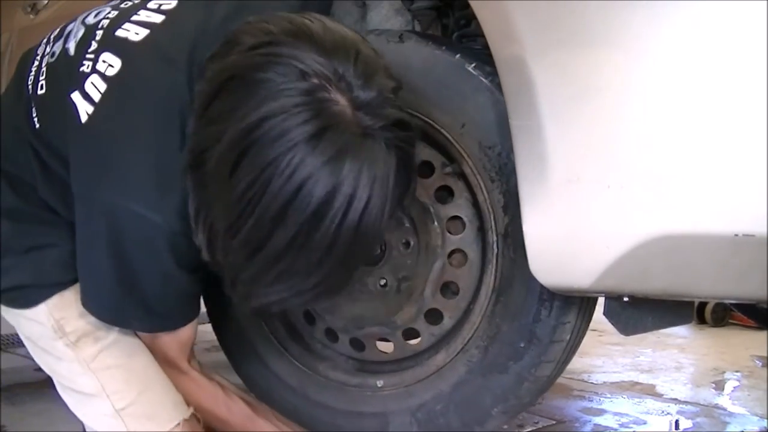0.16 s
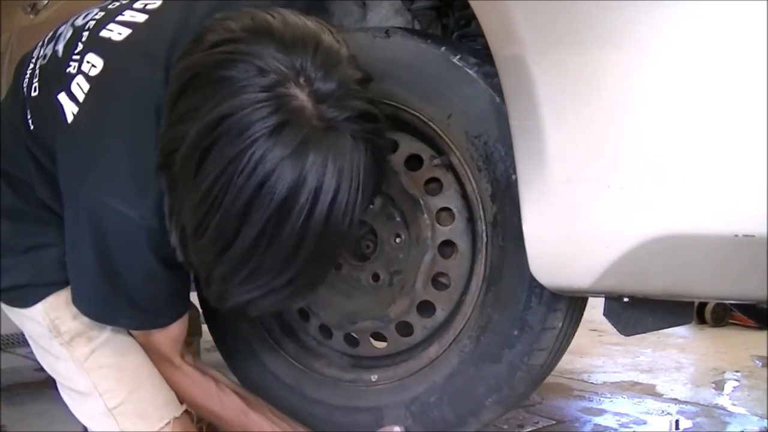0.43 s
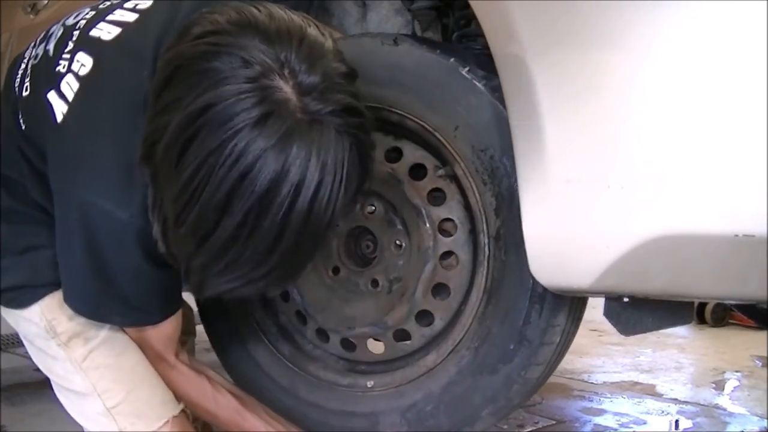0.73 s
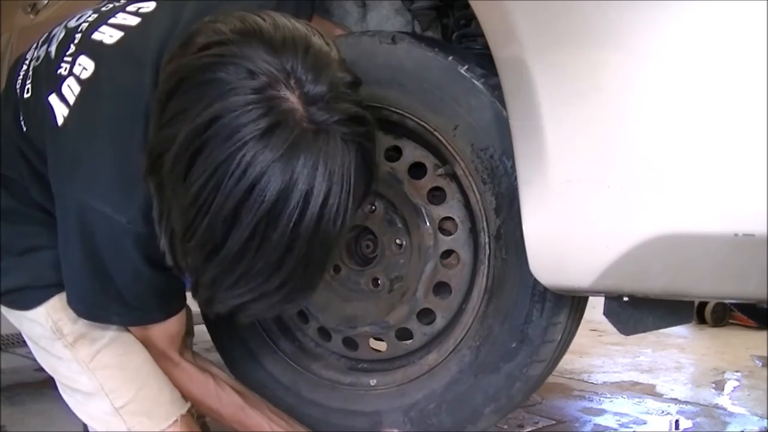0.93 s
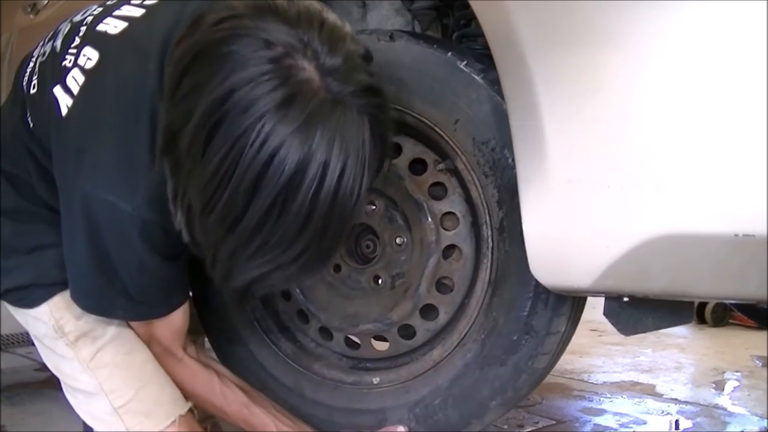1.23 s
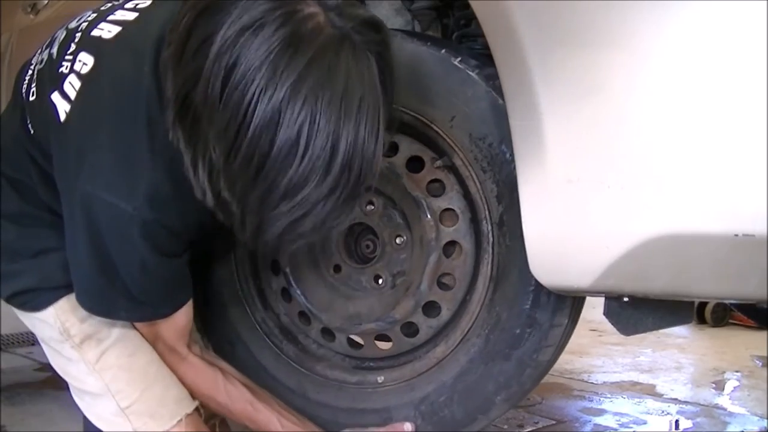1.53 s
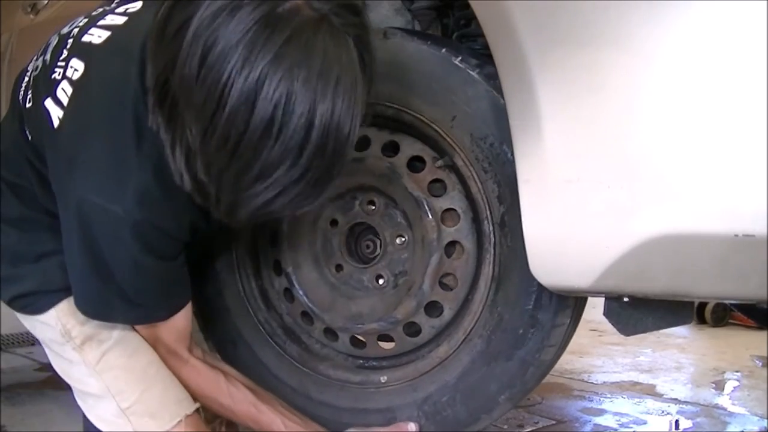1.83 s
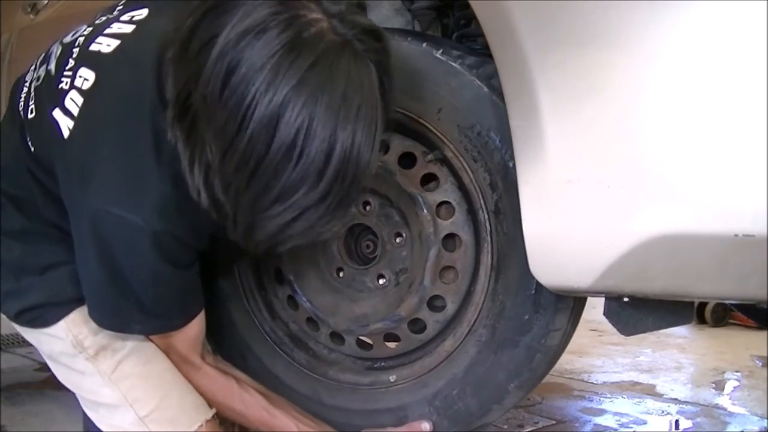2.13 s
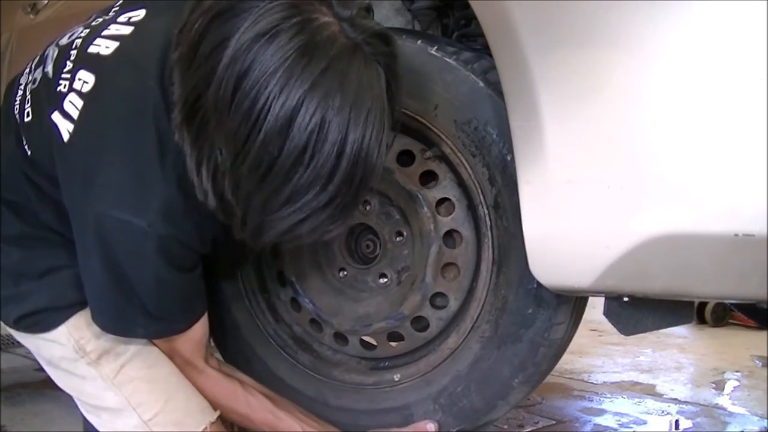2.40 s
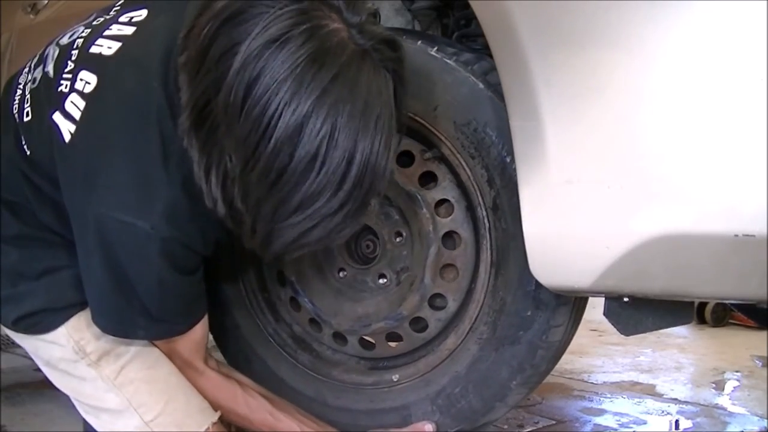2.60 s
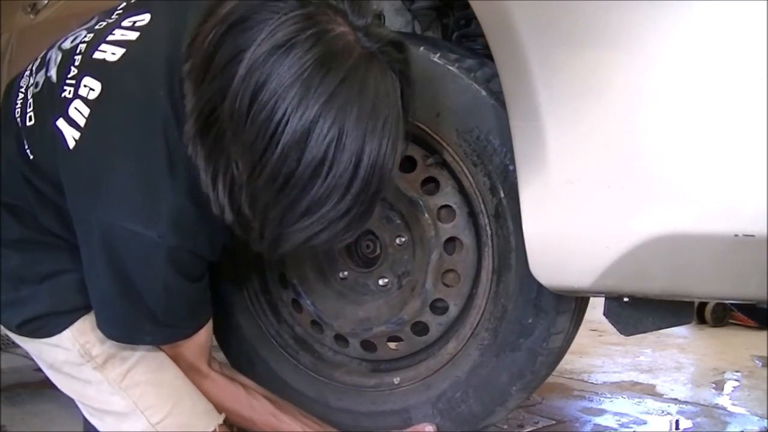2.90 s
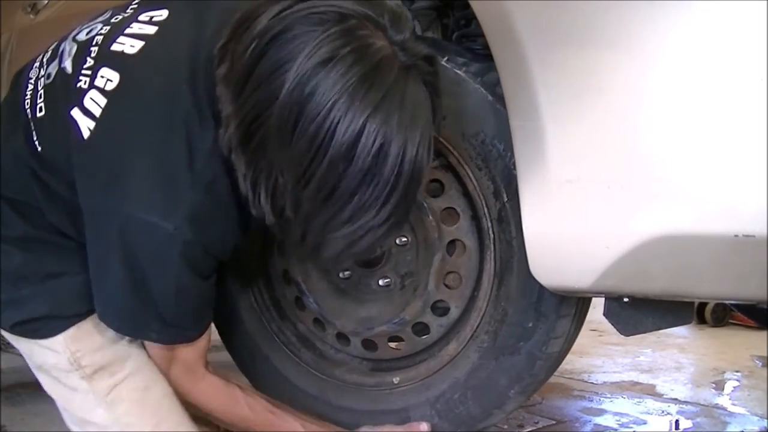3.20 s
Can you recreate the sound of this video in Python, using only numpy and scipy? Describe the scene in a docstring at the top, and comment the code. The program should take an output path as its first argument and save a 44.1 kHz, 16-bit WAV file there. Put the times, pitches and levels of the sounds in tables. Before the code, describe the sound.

A steel wheel clanks and scrapes as it is worked onto a car's hub.

```python
"""Damped steel clanks and tyre thuds, close and almost mono: a wheel is worked onto a car's hub in a garage.
Its centre scrapes over the studs, which catch and ping, and knocks against the hub.
At last it drops onto the studs and the whole rim rings. Underneath, the rocking tyre rumbles,
clothes rustle and grit ticks over faint room noise."""
import sys
import numpy as np
from scipy import signal
from scipy.fft import rfft, irfft, next_fast_len
from scipy.io import wavfile

SR = 44100
rng = np.random.default_rng(int(sys.argv[2]) if len(sys.argv) > 2 else 0)


def to_wav(s):
    """Save 16-bit WAV."""
    ch = np.atleast_2d(s).T  # columns
    pcm = np.round(np.clip(ch, -1, 1) * 32767)  # PCM
    wavfile.write(sys.argv[1], SR, pcm.astype(np.int16))


N = 147735

# The wheel's centre, damped by the hub. Each row: pitch in Hz, relative level in dB, t60 in seconds.
CENTRE_MODES = [(487, -12.5, 0.16), (789, -26, 0.36), (944, -15, 0.13), (1013.6, -6, 0.066),
                (1085.5, 5, 0.099), (1186, 0.5, 0.03), (1313, -7, 0.2), (1430, -5.5, 0.074),
                (1555, -10.5, 0.045), (1800, -11.5, 0.084), (2395, -14.5, 0.093)]
# Studs and hub ringing. One entry per mode: pitch in Hz, relative level in dB, t60 in seconds.
STUD_HZ = [1034, 1427, 1776, 2417, 2930, 3297, 4005, 4135, 4480, 5134, 5852, 6089, 6337, 7358, 7860, 8129,
           8441, 9635, 10100]
STUD_DB = [3, 7.5, -2.5, 5, 2.5, -10, -3.5, 3.5, -15, -1.5, -8, -27.5, -1.5, -4.5, -10, -14, 1.5, -6, -14]
STUD_T60_S = [0.23, 0.1, 0.083, 0.088, 0.1, 0.22, 0.28, 0.047, 0.16, 0.11, 0.18, 0.33, 0.11, 0.09, 0.19,
              .22, 0.06, 0.15, 0.06]
# The studs' crowd of weak modes. Each row: band in Hz, relative level in dB, t60 in seconds.
STUD_WASH = [(855, 12, 0.033), (1390, 1, 0.45), (2000, -26, 0.057), (2570, 12, 0.19), (3320, -13.5, 0.071),
             (4000, 0.5, 0.067), (7000, 0, 0.1), (8300, -2.5, .13), (9800, -1, 0.044), (10150, 5.5, 0.043),
             (12260, -21.5, .08), (15500, -36, .05)]


def undb(db):
    """Decibels to gain."""
    return 10 ** (np.asarray(db) / 20)


def unit(x):
    """Scale to rms 1."""
    return x / np.sqrt(np.mean(x ** 2))


def struck(x, size=882):
    """Scale a hit to rms 1 over its first samples."""
    return x / np.sqrt(np.mean(x[:size] ** 2))


def along(table, hz):
    """Read a table's second column on a log-frequency axis."""
    table = np.array(table, float)
    return np.interp(np.log(np.maximum(hz, 1)), np.log(table[:, 0]), table[:, 1])


def fader(table, column=1):
    """Gain over time from rows of seconds and dB."""
    table = np.array(table, float)
    return undb(np.interp(np.arange(N) / SR, table[:, 0], table[:, column]))


def colour(x, table):
    """Give a steady sound a spectrum, at rms 1."""
    size = next_fast_len(N)
    gains = undb(along(table, np.fft.rfftfreq(size, 1 / SR)))
    return unit(irfft(rfft(x, size) * gains, size)[:N])


def causal(table, count):
    """Minimum-phase response: a given spectrum with nothing ahead of the attack."""
    cepstrum = irfft(np.log(undb(along(table, np.fft.rfftfreq(count, 1 / SR)))), count)
    return np.exp(rfft(cepstrum * (1 + np.sign(np.fft.fftfreq(count)))))


def ring(modes, count):
    """Struck modes as decaying sines of alternating polarity."""
    t = np.arange(count) / SR
    return struck(sum((-1) ** k * undb(db) * np.sin(2 * np.pi * hz * t) * np.exp(-np.log(1000) * t / t60)
                      for k, (hz, db, t60) in enumerate(modes)))


def wash(table, count):
    """A crowd of modes: noise whose bands each die at their own rate."""
    t, hz = np.arange(count) / SR, np.fft.rfftfreq(count, 1 / SR)
    noise = rfft(rng.standard_normal(count))
    band_hz, _, t60s = np.array(table).T
    out = 0
    for share, t60 in zip(np.eye(len(table)), t60s):
        band = along(np.c_[band_hz, share], hz)
        out = out + irfft(noise * band, count) * np.exp(-np.log(1000) * t / t60)
    return struck(irfft(rfft(out) * causal(table, count), count), size=count // 16)


def add(out, start_s, x):
    """Mix a sound in at a time."""
    i = max(int(start_s * SR), 0)
    out[i:i + len(x)] += x[:N - i]


def grains(per_s, spread_db):
    """Random clicks, mostly weak and a few strong."""
    clicks = (rng.random(N) < per_s / SR) * rng.choice([-1, 1], N)
    return clicks * undb(spread_db * np.minimum(rng.exponential(size=N), 4))


def hub_knocks():
    """Each knock cracks, clanks the wheel's centre, thuds the tyre and leaves the rim ringing."""
    # Each row: start in seconds, levels of clank, thud, rim and crack in dB, main clank pitch in Hz.
    knocks = [(.012, -43, -32.5, -47.5, -60, 1080), (0.025, -51, -49, -54, -59, 1050),
              (0.043, -36, -65, -46, -61, 1010), (.365, -37.5, -42, -56, -63, 1060),
              (.678, -34.5, -35, -59, -34, 1108), (.758, -25.5, -24, -43, -34.5, 1100),
              (0.836, -37, -30, -62, -61, 1111), (1.016, -48.5, -39, -53, -45.5, 1140),
              (1.048, -35, -34.5, -50, -61, 1118), (1.092, -19.5, -25.5, -33, -23.5, 1104),
              (1.223, -51, -41, -56, -39, 1040), (1.308, -35, -29, -46.5, -54, 1103),
              (1.730, -34, -33, -51.5, -44, 1083), (1.797, -46, -62, -52.5, -48, 1124),
              (2.476, -49.5, -50, -74, -65, 1113), (2.581, -34, -37, -52, -40, 1109),
              (2.848, -29, -34.5, -58, -52, 1026), (2.872, -18, -21.5, -47, -35, 1092),
              (2.884, -23, -27.5, -72, -27, 1015), (2.899, -39, -37.5, -43.5, -42, 1026),
              (2.929, -30.5, -27, -41, -36.5, 1080), (3.0121, -18, -21.5, -18.5, -17.5, 1108),
              (3.044, -17, -37, -26, -38, 1054), (3.068, -15, -20, -22.5, -26, 1076),
              (3.128, -23.5, -23.5, -37, -33, 1056), (3.194, -23.5, -26, -52, -44, 1035),
              (3.224, -32, -29.5, -28.5, -42, 1080)]
    # The rim ringing freely. One entry per mode: pitch in Hz, relative level in dB, t60 in seconds.
    rim_hz = [184, 262, 404, 484, 505, 603, 966, 1006, 1053, 1088, 1347, 1394, 1491, 1541, 1820, 2005, 2374,
              2941, 3316, 3484]
    rim_db = [-12, -4, -8, -5, -12, -6.5, -7.5, -7.5, -7, 2, -6, -5, -2, -8.5, -11.5, -18.5, -9, -4.5, -16,
              -21.5]
    rim_t60_s = [2.1, 2, 1.15, 0.53, 1.6, 0.45, 4.5, 0.53, 0.43, 0.37, 0.66, 0.89, 0.71, 0.57, 1.2, 0.45,
                 0.7, 0.31, 0.68, 0.37]
    # The other layers of a knock. Each row: frequency in Hz, relative level in dB, t60 in seconds.
    tyre_modes = [(313, 8, 0.022), (86.7, -11, 0.1), (139.7, -9.5, 0.17), (175.1, -10.5, 0.61),
                  (193.4, 0.5, 0.1), (261, 0, 0.15), (312.2, -5, 0.071), (376, -16, 0.04)]  # tyre and suspension
    blow_modes = [(1158, 3.5, 0.034), (347, 2.5, 0.026)]  # the blow itself, very short
    thud_wash = [(30, -37, .5), (60, -29.5, 0.68), (151, -8.5, 0.62), (256, 2.5, 0.23), (454, -12.5, 0.18),
                 (715, -31, 0.6), (2000, -80, .1)]  # the tyre's dull body
    rim_wash = [(60, -8, 1.1), (129, -10.5, 1.6), (232, 2, 2.26), (424, 3, 2.3), (740, -9.5, 1.75),
                (1020, 2, 0.86), (1620, -2.5, 1.06), (2220, -15.5, 1.74), (3500, -18, .7),
                (6000, -38.5, 0.47), (15000, -59, .2)]  # the rim's crowd of weak modes
    crack_wash = [(100, 25, 0.034), (400, -9, 0.45), (710, 10.5, 0.082), (1410, 7.5, 0.11),
                  (2750, 1.5, 0.073), (5200, -17, 0.3), (7700, -13, 0.073), (11100, -36, .07),
                  (15500, -48, .04)]  # the hard edge of contact
    untuned_clank_hz, low_cut_hz = 1090, 60  # a high-pass trims sub-bass from the knocks
    rim = ring(zip(rim_hz, rim_db, rim_t60_s), count=81920)
    tyre = ring(tyre_modes, count=24576)
    snap = 1 + undb(12) * np.exp(-np.arange(8192) / SR / 0.0017)  # lifts the first instant of contact
    out = np.zeros(N)
    for start_s, clank_db, thud_db, ring_db, crack_db, clank_hz in knocks:
        # The clank's pitch shifts with the contact point.
        clank_modes = [(hz * clank_hz / untuned_clank_hz, db, t60) for hz, db, t60 in CENTRE_MODES]
        add(out, start_s, undb(clank_db) * ring(clank_modes, count=12288))
        add(out, start_s, undb(thud_db) * (tyre + undb(-3) * wash(thud_wash, count=24576)))
        add(out, start_s, undb(clank_db - 3) * ring(blow_modes, count=2048))
        add(out, start_s, undb(ring_db) * rim)
        add(out, start_s, undb(ring_db - 1) * wash(rim_wash, count=32768))
        add(out, start_s, undb(crack_db) * struck(snap * wash(crack_wash, count=8192)))
    return signal.sosfilt(signal.butter(2, low_cut_hz, "high", fs=SR, output="sos"), out)


def stud_pings(focus_db=20, focus_octaves=.08, scatter_db=2):
    """A stud slips off an edge and pings; the place of contact favours some of its modes."""
    # Each row: start in seconds, level in dB, favoured pitch in Hz.
    pings = [(.003, -37, 7860), (.005, -51, 2930), (.023, -25.5, 1034), (.036, -37, 7860),
             (.078, -33.5, 2650), (0.084, -36.5, 5134), (0.102, -39.5, 3830), (0.152, -36.5, 6850),
             (.216, -40, 4600), (.298, -51, 8700), (.342, -45.5, 8450), (0.387, -41.5, 4300),
             (.441, -47, 7860), (0.668, -58, 9800), (.677, -35.5, 10400), (0.756, -38.5, 6800),
             (1.093, -41, 7358), (1.093, -40.5, 3297), (1.195, -46, 2750), (1.256, -46.5, 4350),
             (2.799, -44, 4270), (2.847, -35, 3940), (2.849, -25.5, 1034), (2.858, -43, 5134),
             (2.871, -38.5, 6337), (2.872, -31, 2417), (2.884, -37.5, 2930), (2.93, -36, 3960),
             (2.930, -35, 2417), (3.015, -42, 4480), (3.053, -34.5, 7670), (3.056, -33.5, 4005),
             (3.068, -32.5, 4480)]
    out = np.zeros(N)
    for start_s, level_db, favoured_hz in pings:
        scatter = scatter_db * rng.standard_normal(len(STUD_HZ))
        octaves_away = np.log2(np.array(STUD_HZ) / favoured_hz)
        focus = focus_db * np.exp(-(octaves_away / focus_octaves) ** 2)
        modes = zip(STUD_HZ, np.array(STUD_DB) + scatter + focus, STUD_T60_S)
        add(out, start_s, undb(level_db) * ring(modes, count=12288))
        add(out, start_s, undb(level_db - 16) * wash(STUD_WASH, count=4096))
    return out


def stud_scrape():
    """Rusty steel sticks and slips: dense clicks excite the studs and the wheel's centre."""
    # Each row: time in seconds, level of the studs in dB, level of the wheel's centre in dB.
    levels = [(0, -39.5, -32), (.12, -42, -39.5), (.19, -47.5, -42), (.27, -54, -40.5), (.31, -40.5, -39),
              (.44, -40, -43), (.51, -45, -49.5), (.59, -54.5, -50.5), (.66, -44.5, -42),
              (.9, -53.5, -44.5), (1.12, -52.5, -59), (1.24, -48.5, -41.5), (1.38, -62, -46),
              (1.6, -63, -42.5), (1.95, -57, -60), (2.2, -53, -50.5), (2.36, -57, -70), (2.68, -58, -53),
              (2.77, -50.5, -57), (2.81, -42, -44.5), (2.98, -64, -31.5), (3.34, -60, -25.5)]
    slips = grains(per_s=350, spread_db=3)
    stud_body = ring(zip(STUD_HZ, STUD_DB, STUD_T60_S), count=16384)
    stud_body += undb(-3) * wash(STUD_WASH, count=16384)
    studs = unit(signal.fftconvolve(slips, stud_body)[:N])
    centre = unit(signal.fftconvolve(slips, ring(CENTRE_MODES, count=12288))[:N])
    return fader(levels) * studs + fader(levels, column=2) * centre


def grit_ticks(decay_s=.003, half_width_octaves=0.64, top_hz=10500):
    """Grit snaps in tiny bursts of band-passed noise, with no ring."""
    # Each row: start in seconds, level in dB, pitch the band is built around in Hz.
    ticks = [(0.551, -46, 8020), (.679, -35.5, 4370), (1.688, -37.5, 8940), (1.697, -43, 8500),
             (1.703, -45.5, 5460), (1.702, -38.5, 1910), (1.907, -57, 3945), (1.938, -42, 3400),
             (1.955, -51, 3620), (1.998, -53, 4500), (2.902, -46, 7000), (3.205, -36.5, 7900),
             (3.322, -57, 7000)]
    out, t = np.zeros(N), np.arange(2048) / SR
    for start_s, level_db, hz in ticks:
        edges = [hz / 2 ** half_width_octaves, min(hz * 2 ** half_width_octaves, top_hz)]
        burst = rng.standard_normal(len(t)) * np.exp(-t / decay_s)
        tick = signal.sosfilt(signal.butter(2, edges, "band", fs=SR, output="sos"), burst)
        add(out, start_s, undb(level_db) * struck(tick, size=300))
    return out


def tyre_rub():
    """The tyre rubs and rumbles as it is rocked."""
    levels = [(0, -39), (.27, -50.5), (.37, -37.5), (.48, -46.5), (.63, -49.5), (.82, -39.5), (1.0, -35),
              (1.35, -40.5), (1.6, -39.5), (1.95, -43.5), (2.1, -48.5), (2.5, -53), (2.68, -47.5),
              (2.83, -42), (2.95, -34), (3.34, -29.5)]  # Each row: time in seconds, level in dB.
    tone = [(25, -6), (42, -12), (60, -7), (110, -2.5), (175, 4.5), (260, -3), (350, -8.5), (500, -32),
            (700, -27.5), (1500, -67)]  # Each row: frequency in Hz, relative level in dB.
    return fader(levels) * colour(rng.standard_normal(N), tone)


def clothes_rustle():
    """Clothes rustle in swells of fine crackle."""
    levels = [(0, -43.5), (.7, -51), (.87, -53), (1.42, -54.5), (1.53, -45), (1.65, -48), (1.69, -44),
              (1.75, -49), (1.81, -46.5), (1.88, -54), (1.95, -46.5), (2.02, -55), (2.22, -51), (2.3, -55),
              (2.45, -52), (2.7, -61), (2.78, -53.5), (3.15, -45.5), (3.33, -36.5)]  # Each row: time in seconds, level in dB.
    tone = [(300, -12), (900, 5), (1900, 5), (3500, -1), (7000, -6.5), (10000, -12), (13000, -17.5),
            (16000, -26)]  # Each row: frequency in Hz, relative level in dB.
    return fader(levels) * colour(grains(per_s=4000, spread_db=2.5), tone)


def room_tone(level_db=-59):
    """A faint, steady bed of low noise with a trace of hiss."""
    tone = [(15, -38), (25, 16), (82, -4), (221, 4.5), (313, -1), (631, -4.5), (1080, -9.5), (1660, -76.5),
            (2360, -43), (2630, -34.5), (4040, -16.5), (9300, -19), (15500, -18)]  # Each row: frequency in Hz, relative level in dB.
    return undb(level_db) * colour(rng.standard_normal(N), tone)


def garage_walls(direct, t60_s=0.47, echo_db=-19.5):
    """The walls add a short echo, which alone gives a little stereo width."""
    side_eq = [(30, -5), (70, -1), (140, -4.5), (260, -7), (500, 5), (1000, -0.5), (2000, 6.5), (4000, 5),
               (12000, -0.5)]  # Tone of the side signal. Each row: frequency in Hz, gain in dB.
    t = np.arange(SR // 2) / SR
    tails = rng.standard_normal((2, len(t))) * np.exp(-np.log(1000) * t / t60_s)
    echo, side = (signal.fftconvolve(direct, tail / np.linalg.norm(tail))[:N] for tail in tails)
    side = signal.fftconvolve(side, irfft(causal(side_eq, count=4096)))[:N]
    return direct + undb(echo_db) * echo + undb(-24.5) * side * np.array([[1], [-1]])


def scene():
    """Wheel, handling and room tone, mixed in mono and placed in the garage."""
    wheel = hub_knocks() + stud_pings() + stud_scrape()
    return garage_walls(wheel + grit_ticks() + tyre_rub() + clothes_rustle() + room_tone())


def record(dry):
    """Soft saturation rounds the loudest peaks and a steep low-pass cuts the top."""
    drive, top_hz = 0.5, 15750
    rounded = np.tanh(drive * dry) / drive
    return signal.sosfilt(signal.ellip(10, .2, 80, top_hz, fs=SR, output="sos"), rounded)


dry = scene()
out = record(dry)
to_wav(out)
```